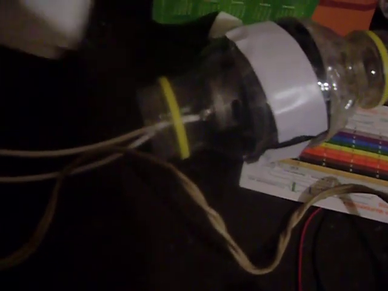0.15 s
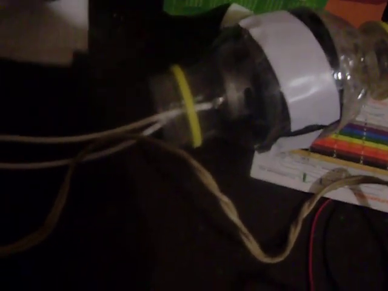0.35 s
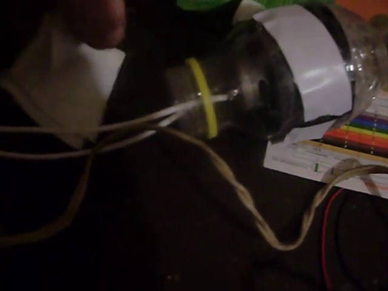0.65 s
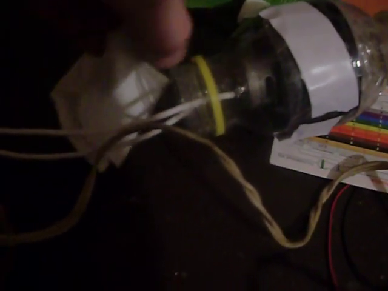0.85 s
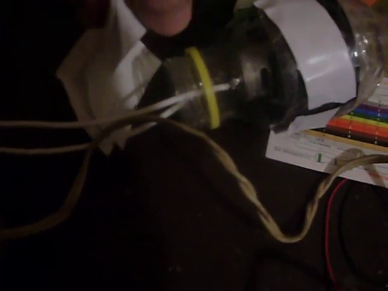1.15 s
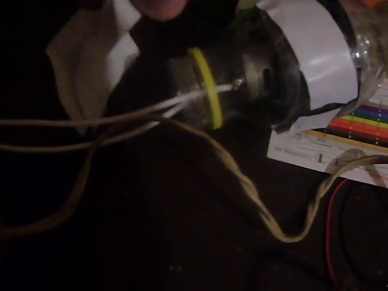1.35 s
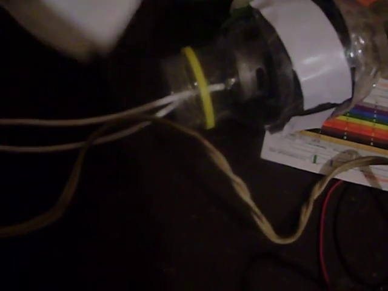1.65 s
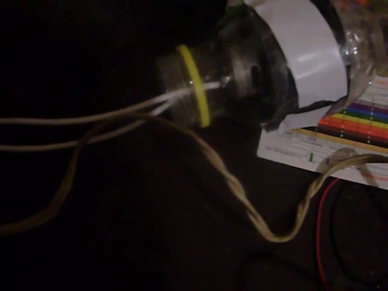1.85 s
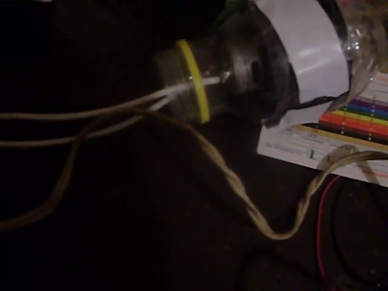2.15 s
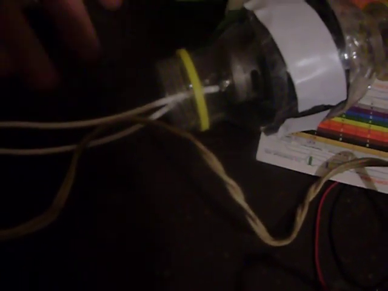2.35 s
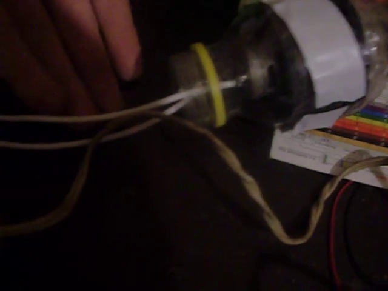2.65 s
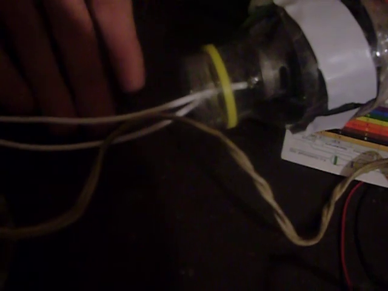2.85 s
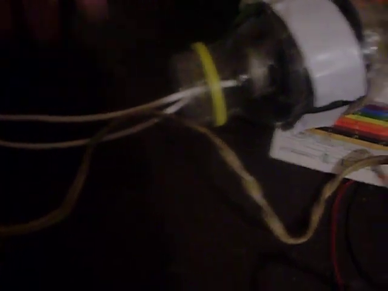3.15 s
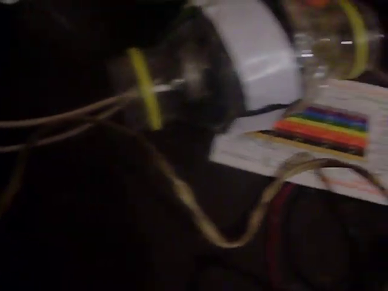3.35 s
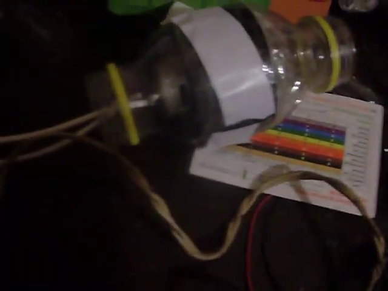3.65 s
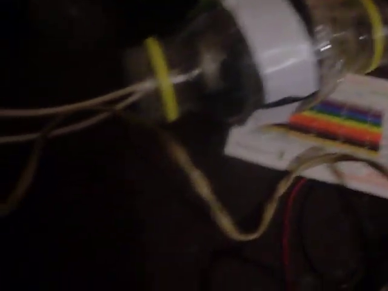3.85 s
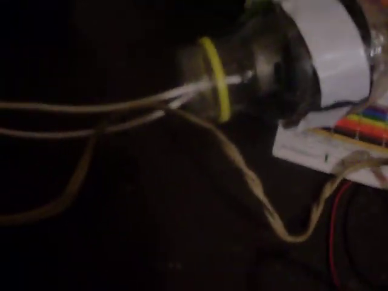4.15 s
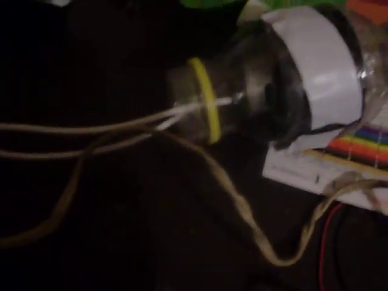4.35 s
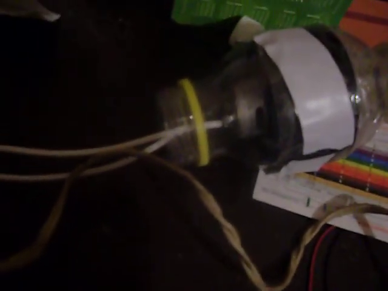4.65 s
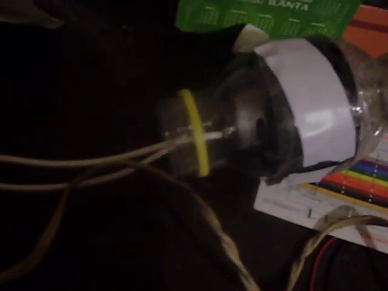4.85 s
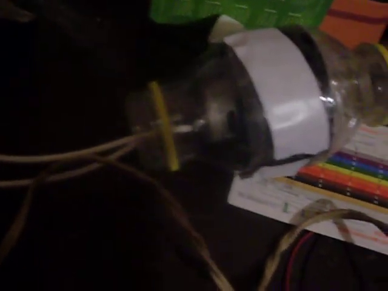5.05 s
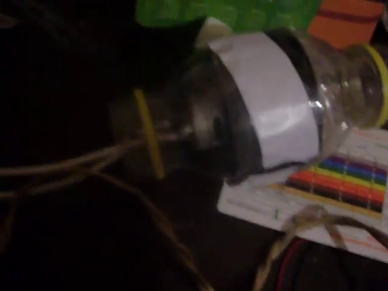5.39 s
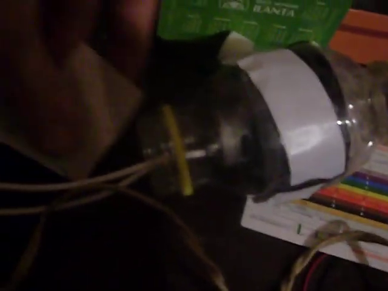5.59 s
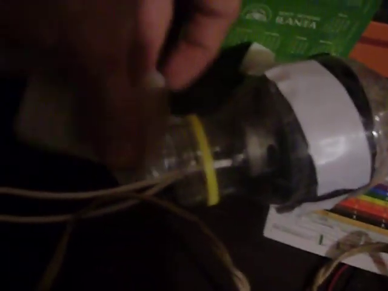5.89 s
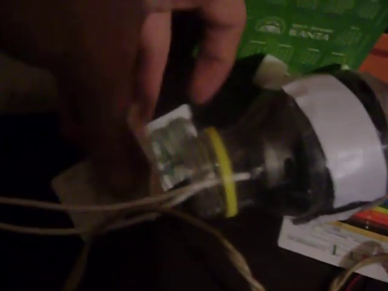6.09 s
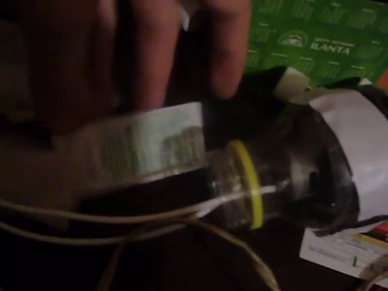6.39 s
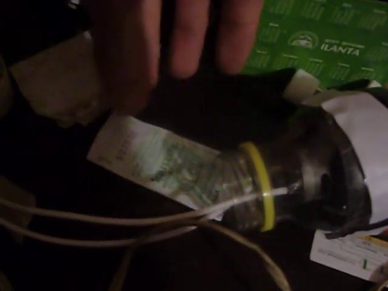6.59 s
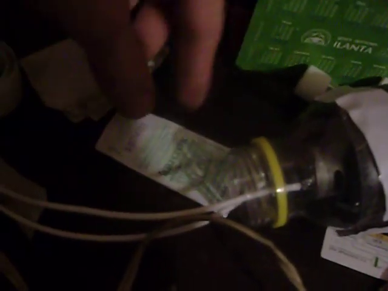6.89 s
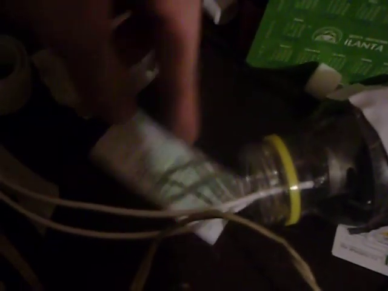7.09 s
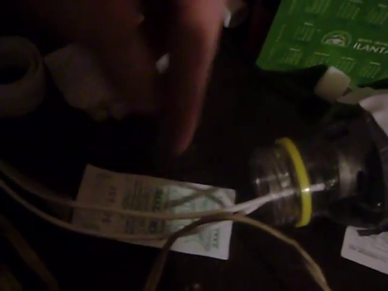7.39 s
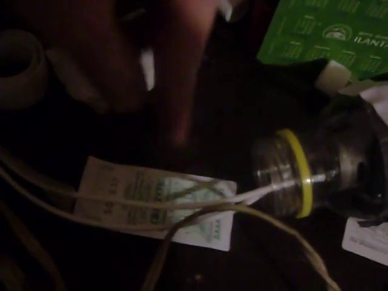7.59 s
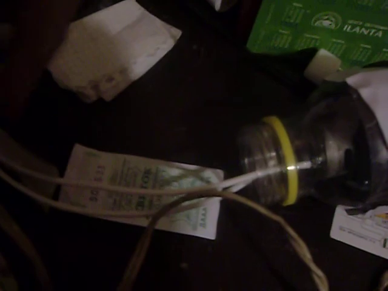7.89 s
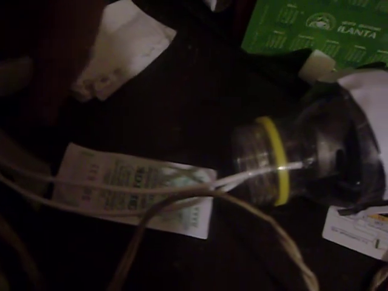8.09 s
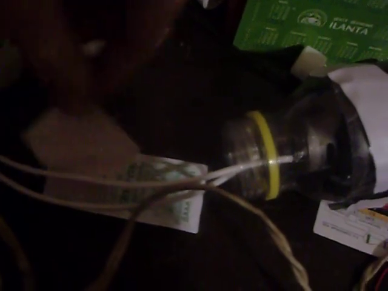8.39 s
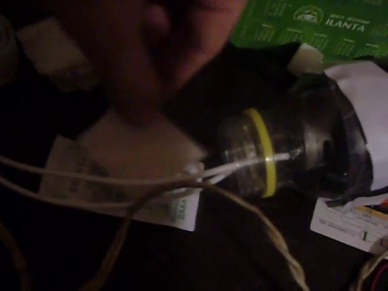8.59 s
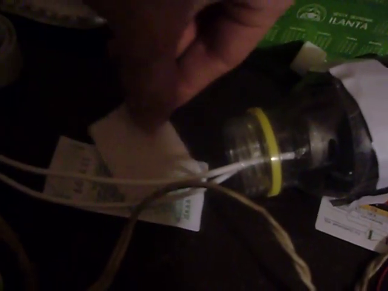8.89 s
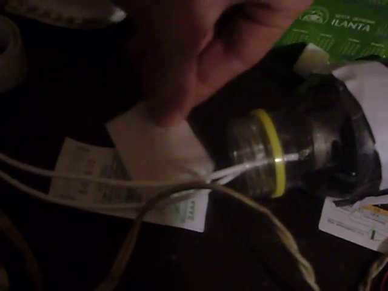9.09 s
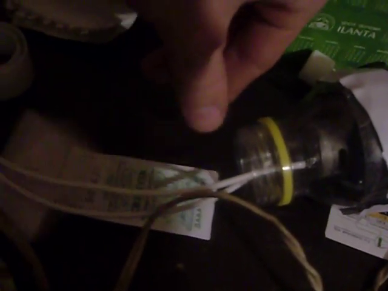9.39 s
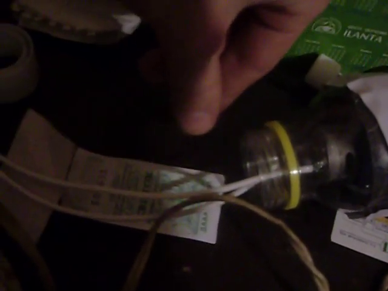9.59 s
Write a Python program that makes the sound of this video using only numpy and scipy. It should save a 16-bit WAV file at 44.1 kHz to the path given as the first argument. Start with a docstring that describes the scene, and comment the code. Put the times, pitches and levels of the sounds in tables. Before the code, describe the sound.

A tiny electric motor spins a fan in a plastic bottle on a desk, heard close indoors. Its steady buzzing hum, hollow air rush and thin high electronic whine never stop. Light plastic ticks come after three seconds; around five to six and a half, paper rustles, snaps and squeaks at the bottle's mouth, then only sparse clicks follow.

```python
"""A small electric motor spins a fan inside a plastic bottle on a desk, heard from close by.
The hum is a stack of wavering shaft harmonics; air is coloured noise, and the brushes rasp once a turn.
A thin electronic whine is one buzzing tone. Paper rustles, snaps and squeaks as shaped noise;
taps on the bottle and bumps on the desk are fading noise. Midway the microphone moves to a new spot."""
import sys
import numpy as np
from scipy import signal
from scipy.fft import rfft, irfft, next_fast_len
from scipy.io import wavfile
from scipy.ndimage import uniform_filter1d

SR = 44100
rng = np.random.default_rng(int(sys.argv[2]) if len(sys.argv) > 2 else 0)


def waveform_to_disk(signal):
    """Save audio, clipped to [-1, 1], as 16-bit WAV at the path in sys.argv[1]."""
    frames = np.transpose(np.atleast_2d(signal))
    scaled = np.clip(frames, -1, 1) * 32767
    samples = np.round(scaled).astype(np.int16)
    wavfile.write(sys.argv[1], SR, samples)


N = 429534
TIME = np.arange(N) / SR  # seconds

# Shaft harmonics, before sway and overall hum gain: multiple, first_spot_db, second_spot_db
HARMONICS = [(2, -86, -85.5), (4, -98, -89), (5, -60.5, -61.5), (6, -68.5, -68), (7, -62.5, -61),
             (8, -69, -65.5), (9, -53.5, -51.5), (10, -59.5, -59), (11, -66, -65), (12, -72.5, -78),
             (13, -68.5, -66), (14, -60, -63), (15, -75, -63), (16, -62.5, -64.5), (17, -58, -57.5),
             (18, -63, -66), (19, -69, -64), (20, -75, -85), (21, -75.5, -74.5), (22, -79, -79),
             (24, -78.5, -91), (27, -78, -88), (31, -70.5, -74), (33, -78, -76.5), (35, -78.5, -73.5),
             (41, -81, -81), (44, -75, -74), (51, -78.5, -78), (54, -83.5, -79)]
# Brief swings of the shaft speed, the largest with paper at the bottle's mouth:
# middle_s, length_s, change_turns_per_s
SPEED_SWINGS = [(1.8, 1.1, -.5), (2.35, .9, .5), (6.08, .9, 1.35), (7.2, 1.1, -.3)]
# Brief swells and dips of the hum: middle_s, length_s, change_db
HUM_SWELLS = [(5.15, 0.88, 0.7), (8.1, 1.5, -1)]
# Basic colour of the rushing air, before resonances and air gain: pitch_hz, level_db_per_hz
AIR_COLOUR = [(25, -104), (80, -106.5), (160, -102.5), (370, -99), (480, -89.5), (1100, -87.5), (1300, -92),
              (1550, -85), (2400, -97), (4000, -98.5), (5500, -101), (6400, -104.5), (7200, -101.5),
              (10300, -105.5)]
# Air resonances of the bottle: pitch_hz, width_hz, first_spot_lift_db, second_spot_lift_db
BOTTLE_RESONANCES = [(212, 29, 8.5, 11), (299, 87, 7, 8.7), (403.7, 18.6, 15, 16), (435, 13.5, 8, 6),
                     (705, 68, 9.5, 7.5), (829, 176, 8.5, 8.5), (1912, 209, 12, 15), (2070, 135, -0.5, 3),
                     (3200, 380, 5.5, 5), (4550, 220, -0.5, 6.5), (5140, 320, 6, 1.5), (5480, 230, -4, 6)]
# Strokes of sliding paper, level before the swell and fade: middle_s, length_s, level_db, centre_hz
PAPER_STROKES = [(.9, .16, -66, 8000), (2.06, .1, -63, 6500), (4.99, 0.34, -58.5, 5700),
                 (5.083, .05, -57, 7500), (5.316, .15, -61, 9000), (5.85, .06, -61, 5800),
                 (6.09, .28, -60, 5470), (6.22, .1, -56.5, 6000), (6.477, 0.17, -63, 7000)]
# Sharp snaps of creased paper, level before the fade: start_s, level_db, centre_hz, width_octaves
PAPER_SNAPS = [(5.349, -38, 8000, .65), (6.005, -48, 4700, .5), (6.027, -47, 4900, .6),
               (6.099, -43.5, 5200, .6), (6.406, -49, 7000, 1), (6.464, -42, 8000, .8),
               (6.4745, -39, 4970, .2), (6.501, -50, 7500, .8), (7.207, -44, 5300, .45),
               (9.429, -42.5, 5170, 0.48), (9.441, -48.5, 4500, .6)]
# Light taps on the plastic bottle, level before the fade: start_s, level_db, centre_hz, width_octaves
BOTTLE_TAPS = [(3.1965, -42.5, 3700, 0.77), (3.23, -47, 2700, 0.64), (5.0712, -40.5, 4730, 0.8),
               (5.35, -44.5, 2900, 0.49), (7.905, -49, 3000, 1)]
# Soft bumps on the desk, level before the fade: start_s, level_db, centre_hz
DESK_BUMPS = [(4.84, -53, 590), (5.57, -62, 230)]

# The shaft slows a little as the motor runs on.
START_TURNS_PER_S, SLOWING_TURNS_PER_S2 = 106.95, .055
# Harmonics above the strongest one waver more, those below it less.
STRONGEST_MULTIPLE, SMEAR_RADIANS = 9, .95
# The microphone eases to a second spot, where the fan is a little louder.
MOVE_START_S, MOVE_SETTLE_S = 4.44, 0.61
HUM_DB, HUM_CLOSER_DB = 0.05, 0.52
AIR_DB, AIR_CLOSER_DB = -0.59, 0.37
# The air rushes a little harder while paper is at the bottle's mouth.
RUSH_MIDDLE_S, RUSH_LENGTH_S, RUSH_DB = 6.3, 1, .6
WHINE_HZ, WHINE_DB, HOPS_PER_S = 7867, -67.36, 15
STROKE_OCTAVES = 0.76
# The paper squeaks once against the rim; the time is the squeak's middle.
SQUEAK_S, SQUEAK_LENGTH_S, SQUEAK_DB, SQUEAK_HZ, SQUEAK_OCTAVES = 6.078, 0.072, -58.5, 9200, 0.056
# Each T60 sets how steeply a burst fades: the time for a 60 dB drop.
SNAP_T60_S, TAP_T60_S, BUMP_T60_S = 0.022, 0.04, .15
BUMP_OCTAVES = .2
# Bottle ring after each tap; its level is relative to that tap.
RING_HZ, RING_OCTAVES, RING_DB, RING_T60_S = 2160, .04, -13.5, 0.16
TREBLE_EDGE_HZ = 11000


def gain_of(db):
    """Turns decibels into an amplitude factor."""
    return 10 ** (np.asarray(db) / 20)


def evened(x):
    """Scales a signal to an average strength (rms) of one."""
    return x / np.sqrt(np.mean(x ** 2) + 1e-20)


def drift(rate_hz):
    """Makes a smooth random wander of rms one, with little movement much faster than the rate."""
    size = 4096
    hz = np.fft.rfftfreq(size, TIME[-1] / size)
    slow = irfft(rfft(rng.standard_normal(size)) * np.exp(-(hz / rate_hz) ** 2))
    return np.interp(TIME, np.linspace(0, TIME[-1], size), evened(slow))


def arch(middle_s, length_s):
    """Rises smoothly from zero to one and falls back."""
    return np.cos(np.pi * np.clip((TIME - middle_s) / length_s, -.5, .5)) ** 2


def band(x, centre_hz, octaves):
    """Keeps one broad hump of a sound's pitches, at an rms of one."""
    size = next_fast_len(len(x))
    hz = np.fft.rfftfreq(size, 1 / SR) + 1  # the 1 avoids log of zero
    hump = np.exp(-.5 * (np.log2(hz / centre_hz) / octaves) ** 2)
    return evened(irfft(rfft(x, size) * hump, size)[:len(x)])


def add(mix, start_s, sound):
    """Mixes a sound in at a given time."""
    part = mix[max(round(start_s * SR), 0):][:len(sound)]
    part += sound[:len(part)]


def shaft(wobble=0.00121, wobble_hz=14):
    """Counts turns so far: the speed sags, swings with the load and quivers with friction."""
    speed = START_TURNS_PER_S - SLOWING_TURNS_PER_S2 * TIME
    for middle_s, length_s, change in SPEED_SWINGS:
        speed = speed + change * arch(middle_s, length_s)
    return np.cumsum(speed * (1 + wobble * drift(wobble_hz))) / SR


def hum(turns, place, sway_db=1.0, sway_hz=1.5, flutter=0.079, flutter_hz=35,
        uneven=0.066, uneven_hz=60, waver_db=0.0412):
    """One uneven pulse a turn, smeared by the bottle: harmonics sway slowly and flutter in the flow."""
    out = np.zeros(N)
    for multiple, first_db, second_db in HARMONICS:
        spot_db = first_db + (second_db - first_db) * place
        sway_size_db = sway_db + waver_db * (multiple - STRONGEST_MULTIPLE)
        level_db = spot_db + sway_size_db * drift(sway_hz)
        start_phase = SMEAR_RADIANS * rng.standard_normal()
        partial = np.cos(2 * np.pi * round(multiple) * turns + start_phase)
        # the square root turns an rms level into a peak
        out += np.sqrt(2) * gain_of(level_db) * (1 + flutter * drift(flutter_hz)) * partial
    return out * (1 + uneven * drift(uneven_hz))


def air(turns, place, chop=0.046, gust_db=.5, gust_hz=30):
    """Turbulence, chopped twice a turn by the blades, rings the air in the bottle."""
    size = next_fast_len(N)
    hz = np.fft.rfftfreq(size, 1 / SR) + 1
    noise = rng.standard_normal(N) * np.sqrt(SR / 2)  # one unit of power per Hz
    chopped = noise * (1 + chop * np.cos(4 * np.pi * turns))
    flow = rfft(chopped * gain_of(gust_db * drift(gust_hz)), size)
    points_hz, points_db = np.transpose(AIR_COLOUR)
    # two rows of colour, one for each microphone spot
    colour_db = np.interp(np.log(hz), np.log(points_hz), points_db) + np.zeros((2, 1))
    for centre_hz, width_hz, *lift_db in BOTTLE_RESONANCES:
        hump = .5 ** ((2 * (hz - centre_hz) / width_hz) ** 2)
        colour_db = colour_db + np.outer(lift_db, hump)
    first, second = irfft(flow * gain_of(colour_db), size)[:, :N]
    return (1 - place) * first + place * second


def brushes(turns, level_db=-66, centre_hz=4900, octaves=0.26, sharpness=1.0):
    """The brushes scrape once a turn: a fine, fast rasp, levelled before the overall air gain."""
    scrape = np.exp(sharpness * np.cos(2 * np.pi * turns)) * rng.standard_normal(N)
    return gain_of(level_db) * band(scrape, centre_hz, octaves)


def whine(hop_radians=1.0, buzz=0.59):
    """A thin electronic tone hops to and fro in phase; short swells, four a hop cycle, make it buzz."""
    cycle = 2 * np.pi * HOPS_PER_S * TIME
    hops = uniform_filter1d(signal.square(cycle), size=24)  # softens each hop's edge
    swells = np.cos(2 * cycle) ** 24
    tone = np.sin(2 * np.pi * WHINE_HZ * TIME + hop_radians * hops)
    return np.sqrt(2) * gain_of(WHINE_DB) * (1 + buzz * swells) * tone


def burst(level_db, centre_hz, octaves, t60_s, attack_s=.0007):
    """A band of noise rises quickly and dies away, ending after 93 ms at the latest."""
    t = TIME[:4096]
    envelope = (1 - np.exp(-t / attack_s)) * np.exp(-np.log(1000) * t / t60_s)
    return band(rng.standard_normal(len(t)), centre_hz, octaves) * gain_of(level_db) * envelope


def paper(grain_db=4.0, grain_hz=190):
    """Sliding paper gives crackly swells and one thin squeak; creases give dry snaps."""
    out = np.zeros(N)
    grains = evened(gain_of(grain_db * drift(grain_hz))) * rng.standard_normal(N)

    def slide(middle_s, length_s, level_db, centre_hz, octaves):
        """Adds one grainy stroke that swells and fades."""
        stroke = grains[abs(TIME - middle_s) < length_s / 2]
        sound = gain_of(level_db) * band(stroke, centre_hz, octaves) * np.hanning(len(stroke))
        add(out, middle_s - length_s / 2, sound)

    for row in PAPER_STROKES:
        slide(*row, STROKE_OCTAVES)
    for start_s, level_db, centre_hz, octaves in PAPER_SNAPS:
        add(out, start_s, burst(level_db, centre_hz, octaves, SNAP_T60_S))
    slide(SQUEAK_S, SQUEAK_LENGTH_S, SQUEAK_DB, SQUEAK_HZ, SQUEAK_OCTAVES)
    return out


def knocks():
    """Taps leave the bottle ringing briefly, and dull bumps sound on the desk."""
    out = np.zeros(N)
    for start_s, level_db, centre_hz, octaves in BOTTLE_TAPS:
        tap = burst(level_db, centre_hz, octaves, TAP_T60_S)
        ring = burst(level_db + RING_DB, RING_HZ, RING_OCTAVES, RING_T60_S)
        add(out, start_s, tap + ring)
    for start_s, level_db, centre_hz in DESK_BUMPS:
        add(out, start_s, burst(level_db, centre_hz, BUMP_OCTAVES, BUMP_T60_S))
    return out


def scene():
    """Mixes all sounds at one microphone; place runs from 0 (first spot) to 1 (second)."""
    turns = shaft()
    place = 1 - np.exp(-np.maximum(TIME - MOVE_START_S, 0) / MOVE_SETTLE_S)
    hum_db = HUM_DB + HUM_CLOSER_DB * place
    for middle_s, length_s, change_db in HUM_SWELLS:
        hum_db = hum_db + change_db * arch(middle_s, length_s)
    air_db = AIR_DB + AIR_CLOSER_DB * place + RUSH_DB * arch(RUSH_MIDDLE_S, RUSH_LENGTH_S)
    motor = gain_of(hum_db) * hum(turns, place)
    rush = gain_of(air_db) * (air(turns, place) + brushes(turns))
    return (motor + rush + whine() + paper() + knocks())[None]


def record(dry):
    """The recorder's treble fades out around 11 kHz."""
    taps = signal.firwin(71, TREBLE_EDGE_HZ, window=("kaiser", 8), fs=SR)
    return signal.oaconvolve(dry, taps[None], "same")


dry = scene()
out = record(dry)
waveform_to_disk(out)
```